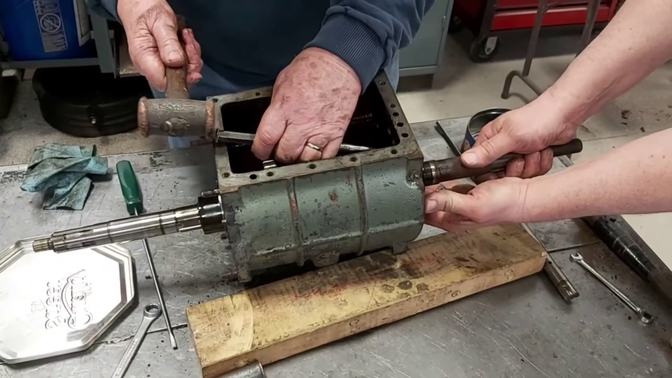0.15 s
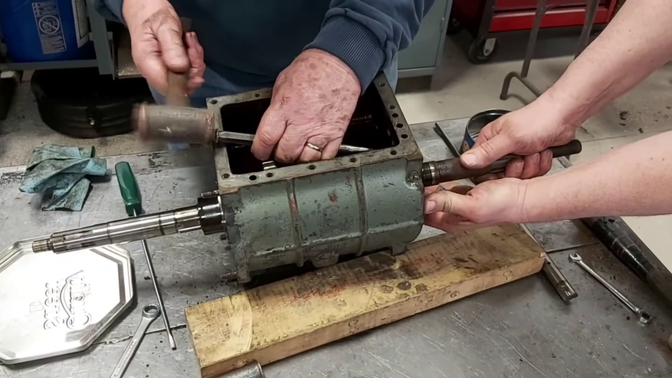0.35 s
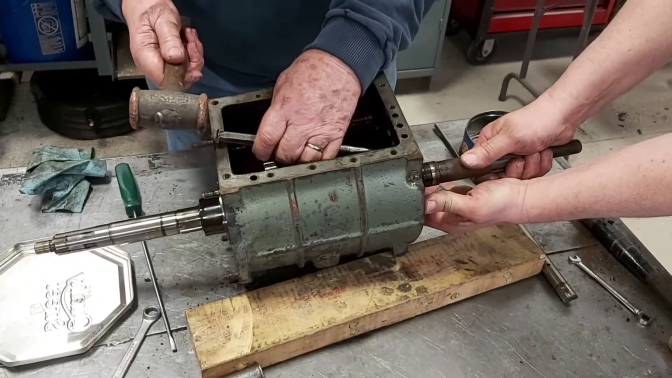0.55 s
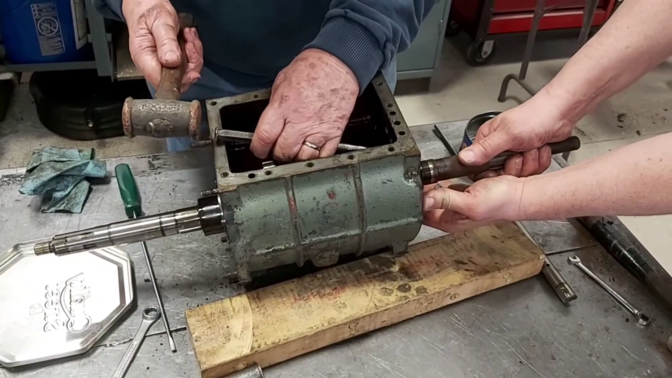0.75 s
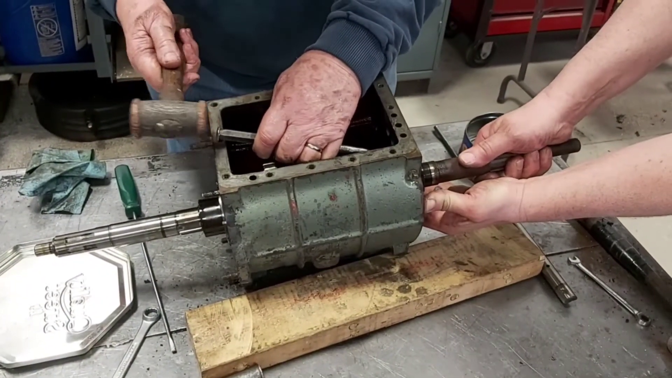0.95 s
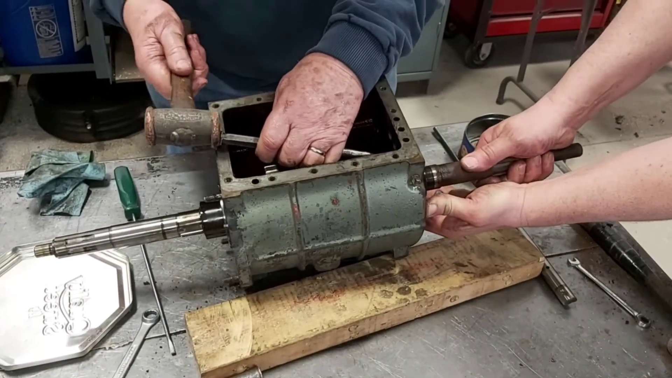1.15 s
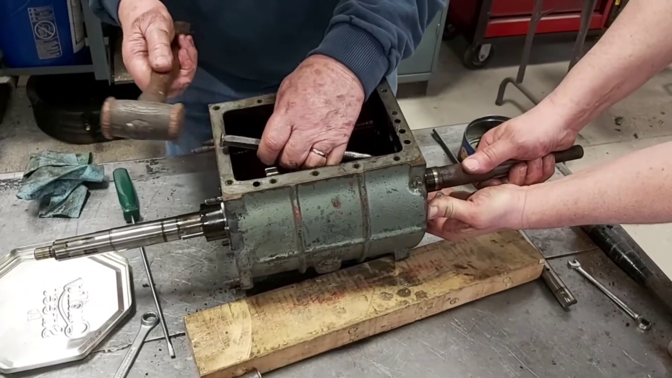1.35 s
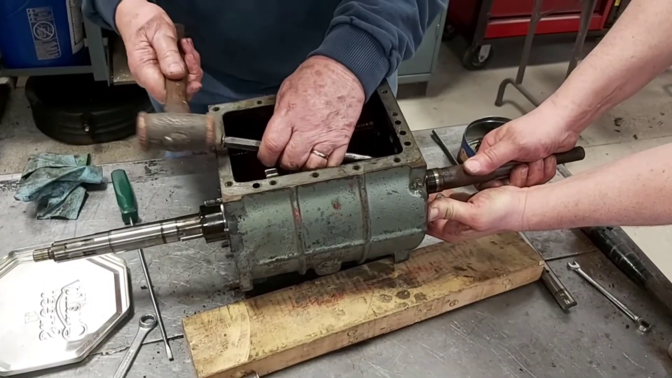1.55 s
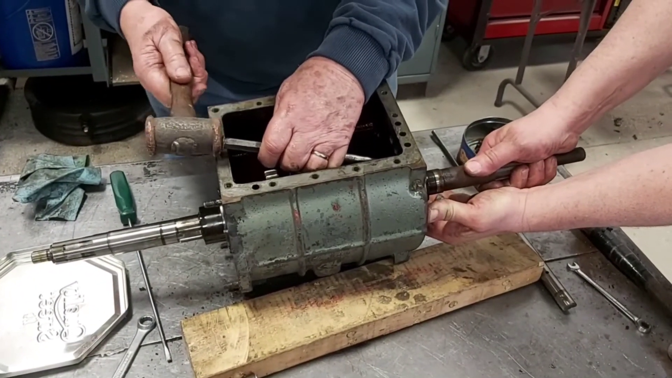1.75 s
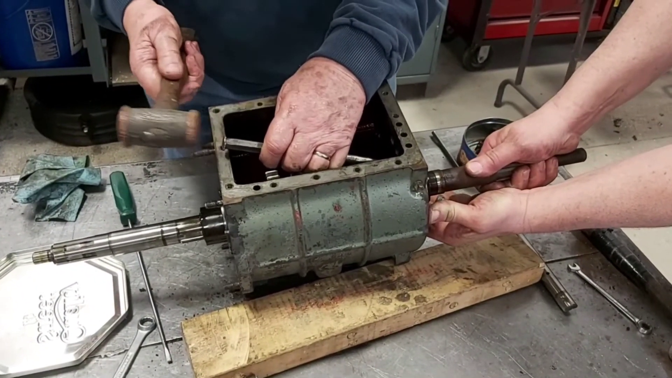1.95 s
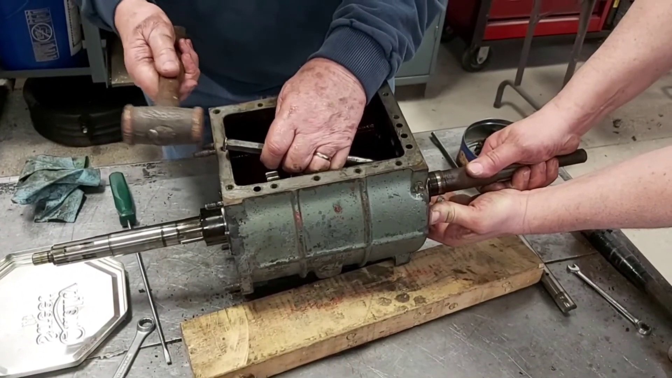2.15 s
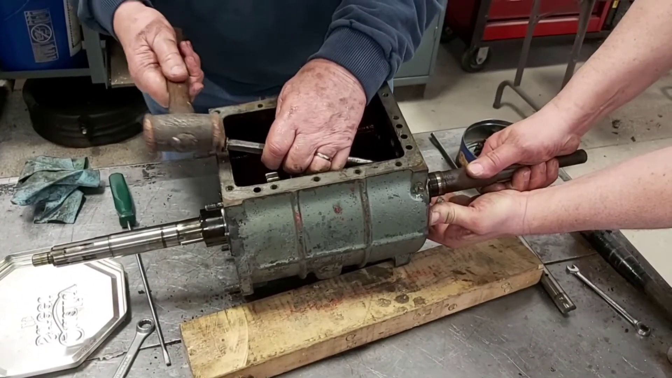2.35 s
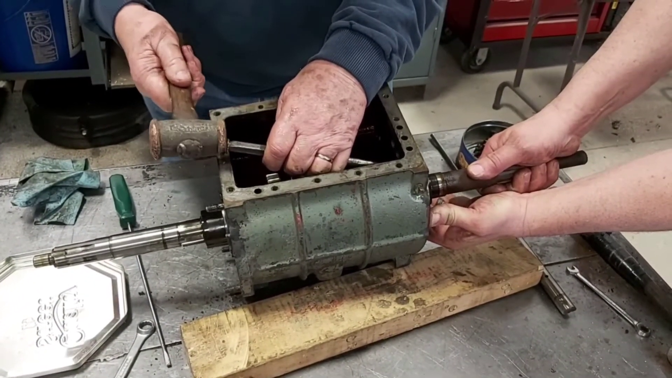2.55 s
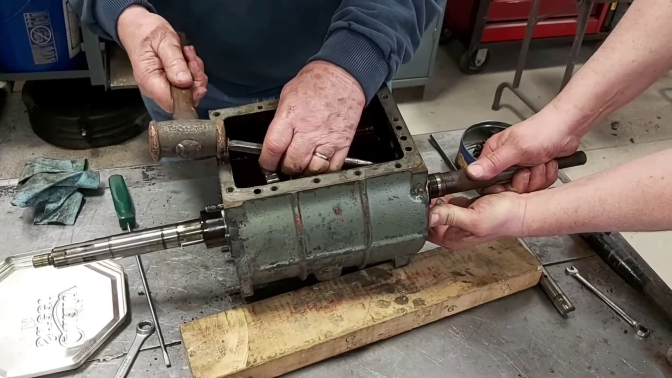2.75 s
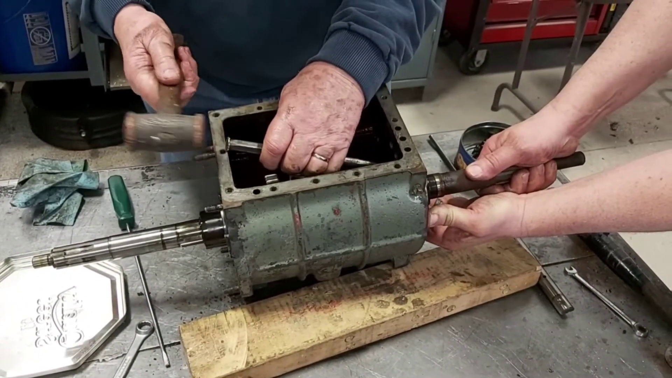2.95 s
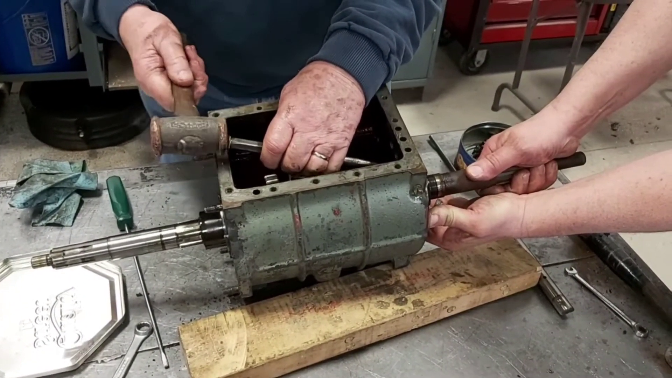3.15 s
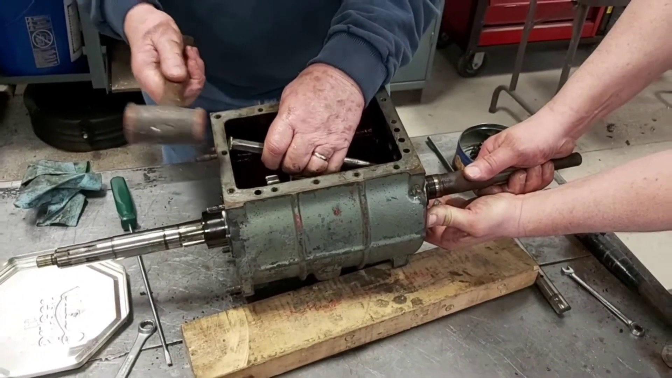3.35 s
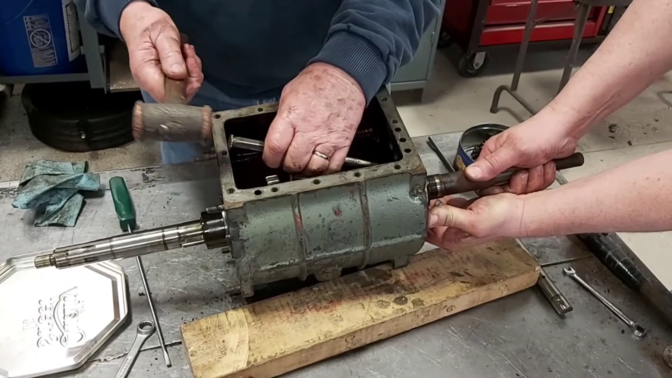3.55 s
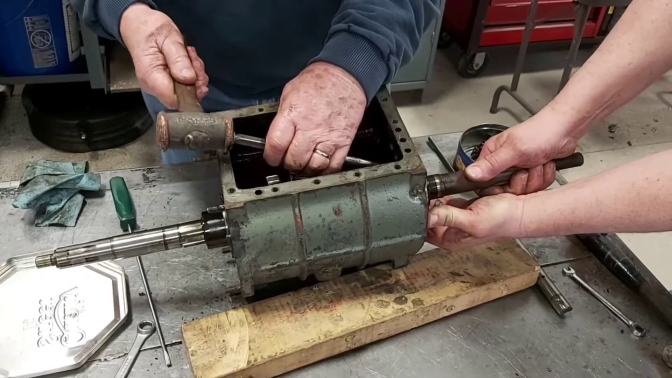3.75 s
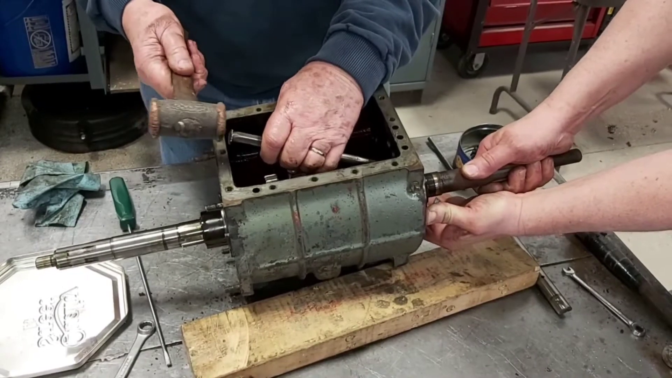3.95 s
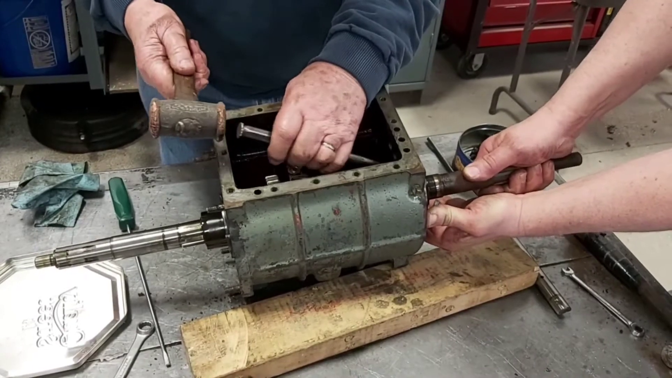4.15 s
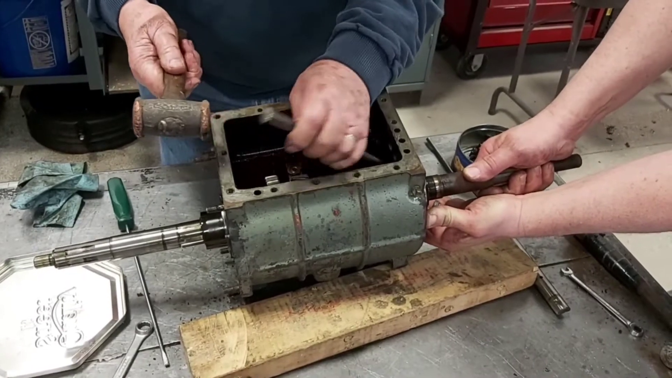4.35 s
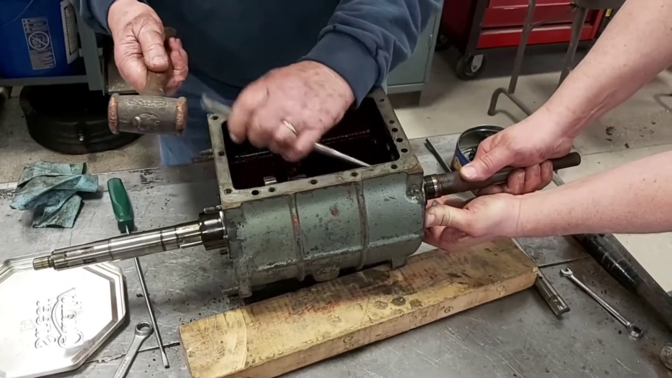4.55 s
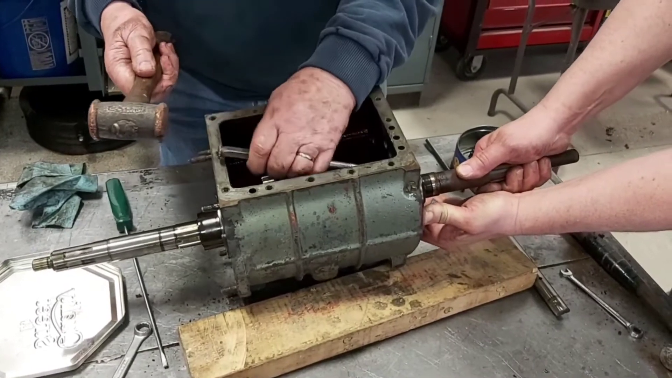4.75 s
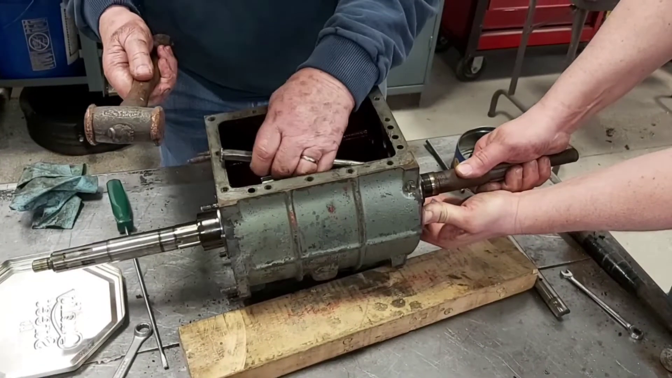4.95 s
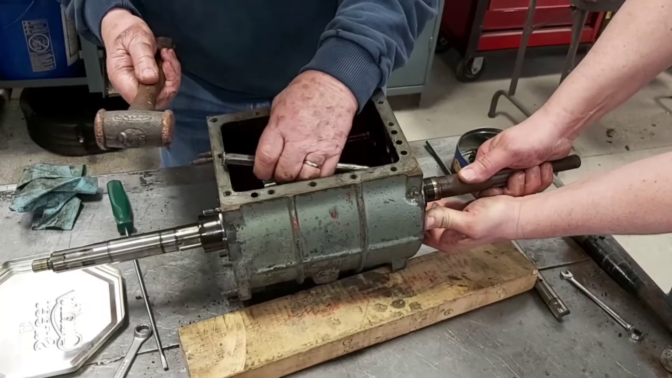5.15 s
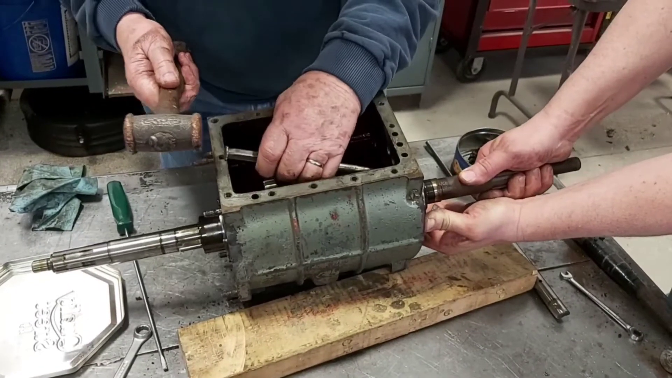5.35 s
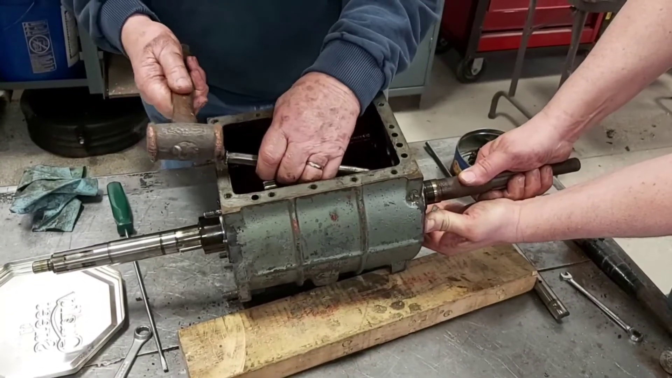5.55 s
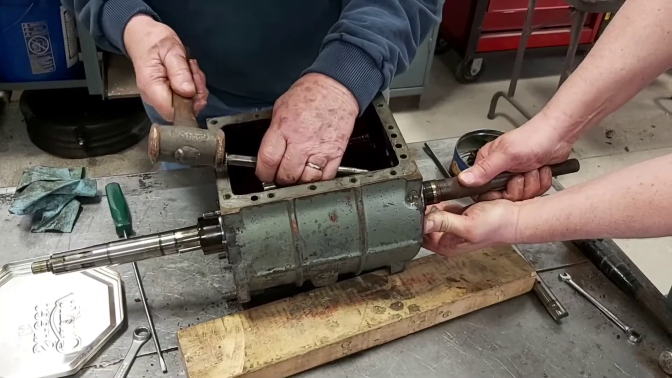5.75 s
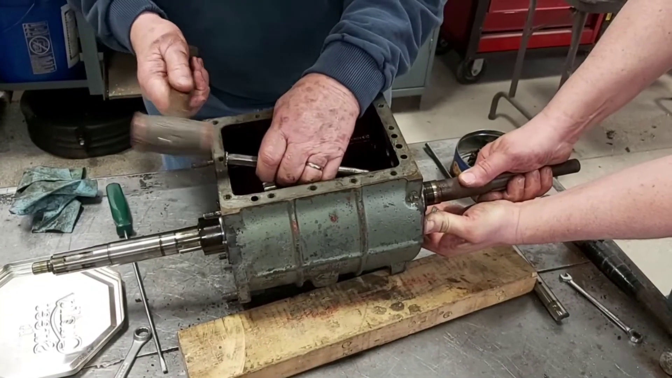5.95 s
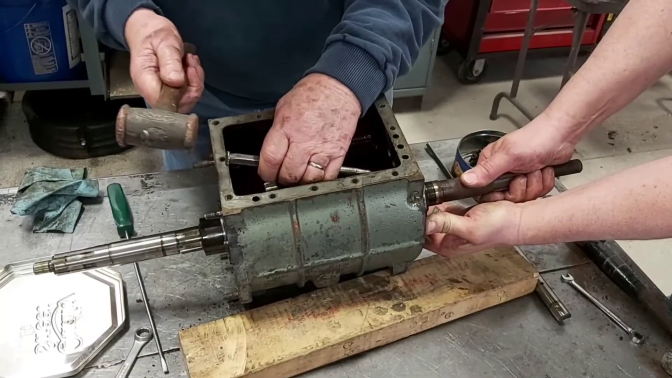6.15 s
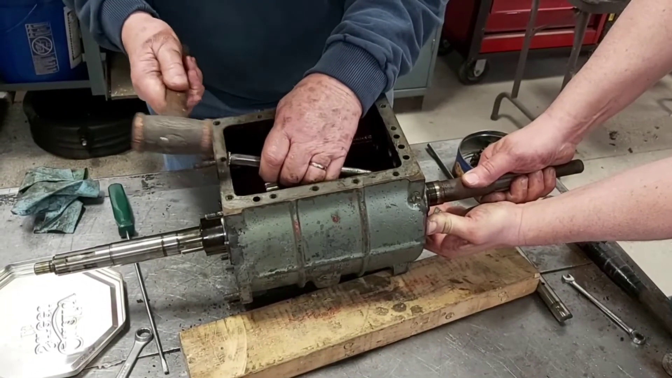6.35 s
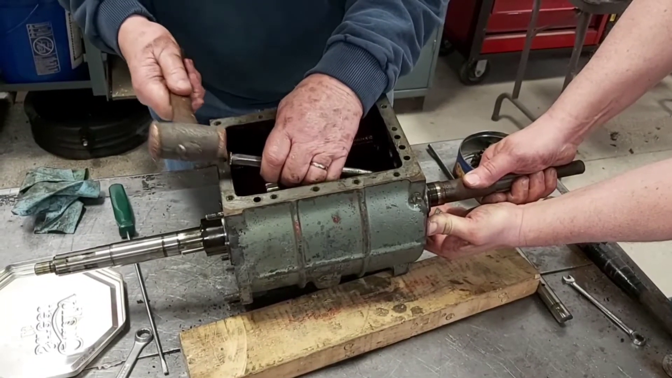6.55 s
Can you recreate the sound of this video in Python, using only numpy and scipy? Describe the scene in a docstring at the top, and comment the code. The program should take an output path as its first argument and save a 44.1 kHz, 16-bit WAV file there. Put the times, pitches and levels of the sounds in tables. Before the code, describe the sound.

Close stereo pickup in a hard-walled workshop. A mallet hits a steel drift against a heavy iron casing: bright, chattering cracks with short metallic ring, leaning left, each followed by roughly a second of room reverberation. Eleven blows come in uneven runs, the late ones ringing loudest. A pause brings soft rustle, dull wooden bumps and a clear steel clink, then five steady blows finish.

```python
"""A mallet drives a steel drift into a cast-iron gear casing that lies on a plank in a hard-walled workshop.
Low noise starts louder with an earlier blow's tail; each blow chatters (shaped noise), rings the casing (decaying
modes) and pushes air, mostly to the left. The room answers with a diffuse field that decays band by band; light
touches bounce once. The shaft sings (resonant noise) most near 3.7 s; in a pause after it there is a rustle, the
casing bumps on the plank and the drift clinks back in, grating and ringing in its own modes; then blows resume."""
import sys
import numpy as np
from scipy import signal
from scipy.fft import rfft, irfft
from scipy.io import wavfile

SR = 44100
rng = np.random.default_rng(int(sys.argv[2]) if len(sys.argv) > 2 else 0)


def master_out(mix):
    """Clip the mix to full scale and print it as 16-bit PCM to the path in sys.argv[1]."""
    frames = np.transpose(np.atleast_2d(mix))
    ceiling = np.clip(frames, -1, 1)
    pcm = np.round(ceiling * 32767).astype(np.int16)
    wavfile.write(sys.argv[1], SR, pcm)


N = 290619
SHORT, LONG = SR // 2, SR * 5 // 4  # buffer lengths in samples: 0.5 s and 1.25 s

# Level tables hold relative decibels; a density is the relative power per hertz of a noise spectrum.
# workshop's low noise: pitch_hz, density_db
WORKSHOP_NOISE = [(18, -30), (30, -30.5), (134, -14), (364, -8.5), (415, -19.5), (760, -19.5), (937, -20),
                  (1630, -23), (1760, -23), (5450, -36.5), (11100, -39.5), (16000, -59)]
# louder stretches of the low noise, the fading tail of an earlier blow at the start, then a rustle
# in the pause: start_s, end_s, level_db
LOUDER_STRETCHES = [(0, 0.16, -47), (3.95, 5.495, -51)]
STRETCH_FADE_DB_PER_S, QUIET_DB = 24, -67

# mallet blows: start_s, crack_db, brightness_db, stressed_region_hz, main_ring_db, body_mode_db,
# slap_db, air_puff_db, room_share_db
BLOWS = [(0.1485, -14.5, -5.5, 3720, -18, -20, -37, -40, -22.5),
         (0.4355, -23, -13.5, 2040, -13, -38, -36, -32, -10.5),
         (1.2064, -20.5, -0.5, 5090, -29.5, -49, -28, -19.5, -16),
         (1.5337, -19.5, -3, 4730, -29, -43, -27.5, -20.5, -14),
         (1.8181, -17, 2, 4300, -24, -33, -27, -25.5, -16),
         (2.0724, -19, 2.5, 5440, -28, -41, -21.5, -36, -17),
         (2.3423, -17.5, 0.5, 5000, -29.5, -33, -37.5, -33.5, -18),
         (2.5914, -18, -1.5, 2420, -28, -33, -24.5, -26, -14.5),
         (3.1873, -17, -1.5, 3040, -32, -38, -83, -38.5, -18),
         (3.47, -10.5, -1.5, 2450, -17.5, -33.5, -43, -33, -21.5),
         (3.7179, -17.5, -2.5, 3050, -22, -42, -41, -41, -14),
         (5.5972, -15.5, -5.5, 3770, -19, -68, -42, -52, -15),
         (5.8474, -17.5, -8.5, 1990, -27, -42, -51, -43, -11.5),
         (6.088, -20, -4.5, 2050, -31.5, -47, -25.5, -21, -13),
         (6.3305, -16.5, 0.5, 4000, -29.5, -26, -21.5, -46.5, -16),
         (6.5782, -18.5, -3, 3040, -29.5, -26, -23.5, -43, -16)]
# modes of the casing: pitch_hz, level_db, t60_s
CASING = [(382, 0, .11), (853, -5, .09), (945, 0, .035), (998, -2, .045), (1372, 0, .07), (1600, -9, .03),
          (1750, -10, .12), (2150, -9, .04), (2495, -7, .09), (2620, -5, .05), (3000, -1, .055),
          (3740, -3, .045), (4225, 0, .05), (4750, -5, .05), (5210, -3, .06), (5410, -3, .07),
          (6150, -6, .045), (7150, -5, .04), (7600, -4, .04), (8745, -6, .07), (11850, -11, .06)]
BODY_TOP_HZ, RING_TOP_HZ, OVERTONE_TOP_HZ = 600, 1150, 1900
# dense upper modes of the casing: pitch_hz, density_db
CRACK = [(100, -27), (300, -8.5), (700, -7), (1200, -2.5), (2000, -2.5), (3300, -5.5), (4600, -1.5),
         (6200, -3.5), (7700, 0.5), (9300, -7.5), (12000, -6.5), (15500, -16.5)]
# room's answer to a crack: pitch_hz, density_db
ROOM = [(50, -12.5), (100, 2), (200, -1), (380, 1.5), (600, 1.5), (1100, 2), (1800, 5), (3200, 1.5),
        (4800, 1), (6400, -4.5), (7800, -3.5), (9500, -10.5), (15000, -18.5)]
# room's answer to the ring: pitch_hz, density_db
ROOM_RING = [(400, -61), (720, -13), (870, -3.5), (945, 1), (1005, 5), (1100, -14.5), (1380, -6),
             (1900, -12), (4000, -61)]
# casing modes that stand out in the room's wash: pitch_hz, level_db
LINGERING = [(380, 6), (855, 1.5), (1755, -0.5)]
# reverberation: pitch_hz, t60_s
ROOM_T60 = [(80, 0.39), (350, 0.53), (950, 0.77), (1400, 0.92), (3000, 0.82), (5500, 0.71), (9000, 0.5),
            (15000, 0.32)]
# left minus right for direct sound: pitch_hz, difference_db
NEAR_LEAN = [(100, -14.5), (400, 2.5), (1000, -1), (2000, 1.5), (3300, 6), (4800, 11), (8000, 14.5),
             (15000, 14)]
# left minus right for room sound: pitch_hz, difference_db
ROOM_LEAN = [(100, 3.9), (300, 1), (1000, 1.1), (2500, 1.3), (4800, 7), (8000, 7.5), (15000, 5)]
# likeness of left and right noise: pitch_hz, correlation (no unit)
LIKENESS = [(100, 0.98), (500, 0.66), (1000, 0.14), (2000, 0), (4000, 0.085), (15000, 0.1)]
# modes of the loosened shaft: pitch_hz, level_db
SINGING = [(2500, 2), (2640, 3), (2960, -5), (3620, -5), (4220, -3), (5420, 5), (8790, -1)]
# light touches: start_s, crack_db, brightness_db, main_ring_db, body_mode_db, overtones_db
TOUCHES = [(0.9167, -24, -3.5, -36.5, -27, -30.5), (2.9591, -30.5, 3.5, -41, -52, -43),
           (4.08, -26, -14.5, -25, -40.5, -31.5), (5.0114, -25, -14, -29, -48, -29.5),
           (5.3449, -26, -9, -24, -46, -20.5)]
# casing rocking on the plank: start_s, level_db
BUMPS = [(4.239, -29.5), (4.248, -26), (5.335, -33)]
# spectrum of the plank: pitch_hz, density_db
PLANK = [(50, -33), (90, -3.5), (170, -0.5), (300, -7.5), (700, -8.5), (1500, -23.5), (4000, -32),
         (14000, -44)]
# drift touching the casing: start_s, level_db, contact_s
CLINKS = [(4.473, -42, 0.0044), (4.494, -40, 0.0028), (4.505, -39.5, 0.0013), (4.8316, -17, 0.0046),
          (4.8454, -18.5, 0.0017), (4.962, -39, 0.0021), (5.015, -43, 0.0045)]
# modes of the drift when free of the hand: pitch_hz, level_db, t60_s
DRIFT = [(960, -6, .06), (1385, -8, .08), (3146, -2, .2), (3268, -3, .18), (5998, 4, .2), (6070, -7, .05),
         (6500, -11, .06), (9392, 4, .065), (9455, 0, .06), (9570, 0, .035), (13540, -9, .07),
         (13660, -8, .06)]

# all touches share their pitch, stressed region, clarity, room share and bounce
TOUCH_PITCH_HZ, TOUCH_STRESS_HZ, TOUCH_CLARITY_DB = 1020, 3430, 1
TOUCH_ROOM_DB, BOUNCE_S, BOUNCE_LOSS_DB = -22.5, .0065, 6.5
USUAL_RING_DB, USUAL_SLAP_DB = -26, -36
# a stronger ring favours the higher of the main modes
RING_PITCH_HZ, PITCH_HZ_PER_DB = 949, 10
# overtones grow with the ring; a firmly seated blow, which slaps, damps them (factors in dB per dB)
OVERTONE_DB, OVERTONE_FOLLOWS, SEATING_DAMPS = -27, 0.74, 0.18
# the contact stresses one region, more so if sharper or with a stronger ring (factors in dB per dB)
STRESS_DB, STRESS_PER_BRIGHTNESS, STRESS_PER_RING = 7, 0.44, 0.31
# a stronger ring lets the clear upper modes stand out from the chatter (dB per dB)
CLARITY_PER_RING = 0.085
# the shaft works loose and sings most near this moment; its level is relative to the crack
LOOSE_S, SING_DB, SING_FALL_DB_PER_S = 3.68, -9.5, 51
LEFT_LEAD_S, CUTOFF_HZ = 3 / SR, 16000
HZ = np.arange(20, 16000, 10)  # pitches of a finely drawn spectrum
KNOTS = np.arange(0, 16100, 80)  # pitches in Hz at which the upper modes ripple the spectrum


def from_db(db):
    """Decibel law: an amplitude ratio from a level."""
    return 10 ** (np.asarray(db) / 20)


def at_hz(points, hz):
    """Log-frequency interpolation: read a table at given pitches."""
    f, value = np.transpose(points)
    return np.interp(np.log(np.maximum(hz, 1)), np.log(f), value)


def lean(db):
    """Level panning: left and right gains of mean power 1 for a level difference."""
    gains = from_db(np.array([[.5], [-.5]]) * db)
    return gains / np.sqrt(np.mean(gains ** 2, axis=0))


def fade(t60, size):
    """Exponential damping: a fall of 60 dB in t60 seconds."""
    return from_db(-60 * np.arange(size) / SR / t60)


def contact(length_s, size):
    """Finite contact time: vibration builds up smoothly to full strength."""
    return np.sin(np.pi / 2 * np.minimum(np.arange(size) / SR / length_s, 1)) ** 2


def level(x, db):
    """Root-mean-square scaling: set the level of a sound's first 27 ms."""
    return x * from_db(db) / np.sqrt(np.mean(x[:, :int(.027 * SR)] ** 2) + 1e-20)


def add(track, s, x):
    """Superposition: mix a sound in at time s."""
    i = round(s * SR)
    track[:, i:i + x.shape[1]] += x[:, :N - i]


def noise(spectrum, leaning, size, band=(20, 16000)):
    """Partial coherence: coloured stereo noise with rms 1 inside the band."""
    hz = np.fft.rfftfreq(size, 1 / SR)
    mid, side = rfft(rng.standard_normal((2, size)))
    alike = np.clip(at_hz(LIKENESS, hz), -1, 1)
    gain = from_db(at_hz(spectrum, hz)) * (hz > 20)
    gain = gain / np.sqrt(2 * np.mean(gain ** 2 * (hz > band[0]) * (hz < band[1])))
    stereo = np.sqrt(1 + alike) * mid + np.sqrt(1 - alike) * side * [[1], [-1]]
    return irfft(gain * lean(at_hz(leaning, hz)) * stereo, size)


def brighter(spectrum, bright_db):
    """Contact sharpness: a sharper contact lifts the top of a spectrum."""
    lift = [(4000, 0.064), (8000, 0.94)]
    return [(hz, db + bright_db * at_hz(lift, hz)) for hz, db, *rest in spectrum]


def tinted(spectrum, extra_db):
    """Spectral product: finer detail laid over a short spectrum."""
    return np.column_stack([HZ, at_hz(spectrum, HZ) + extra_db])


def peaks(modes, width_hz):
    """Resonance curves: the summed power spectrum of a set of modes."""
    power = sum(from_db(db) ** 2 / (1 + ((HZ - hz) / width_hz) ** 2) ** 1.5 for hz, db, *rest in modes)
    return np.column_stack([HZ, 10 * np.log10(power)])


def ring(modes, contact_s, bright_db=0):
    """Modal superposition: decaying sines of varying strength, the upper ones out of step at the two sides."""
    t = np.arange(SHORT) / SR + [[LEFT_LEAD_S], [0]]
    out = 0
    for (hz, db), (_, _, t60) in zip(brighter(modes, bright_db), modes):
        phase = rng.uniform(0, 2 * np.pi) + rng.normal(0, 1, (2, 1)) * min(hz / 5000, 1)
        gain = from_db(db + rng.normal(0, 2.5)) * lean(at_hz(NEAR_LEAN, hz))
        out = out + gain * np.sin(2 * np.pi * hz * t + phase) * fade(t60, SHORT)
    return out * contact(contact_s, SHORT)


def swing(hz, t60):
    """Damped oscillator: a decaying sine that starts from zero."""
    return np.sin(2 * np.pi * hz * np.arange(SHORT) / SR) * fade(t60, SHORT)


def reverberate(x, build_s):
    """Diffuse field: sound builds up, then dies band by band; decay gain is 1 at a tenth of a second."""
    hz, spectrum = np.fft.rfftfreq(LONG, 1 / SR), rfft(x)
    out = 0
    for k, (_, t60) in enumerate(ROOM_T60):
        # overlapping triangular bands that add up to one
        share = at_hz([(f, j == k) for j, (f, _) in enumerate(ROOM_T60)], hz)
        out = out + irfft(spectrum * share, LONG) * fade(t60, LONG) * from_db(6 / t60)
    return out * contact(build_s, LONG)


def background():
    """Power addition: steady low noise is louder in an earlier blow's tail at the start and a later rustle."""
    t, gain = np.arange(N) / SR, from_db(QUIET_DB)
    for start_s, end_s, db in LOUDER_STRETCHES:
        away_s = abs(t - np.clip(t, start_s, end_s))
        gain = np.hypot(gain, from_db(db - STRETCH_FADE_DB_PER_S * away_s))
    return gain * noise(WORKSHOP_NOISE, ROOM_LEAN, 7 * SR)[:, :N]


def casing_modes(low, high):
    """Modal grouping: the casing's modes within a range of pitch."""
    return [mode for mode in CASING if low <= mode[0] < high]


def main_modes(pitch_hz, reach_hz=82.7):
    """Point excitation: the spot that is struck favours the main modes near one pitch."""
    return [(hz, db - 6 * abs(hz - pitch_hz) / reach_hz, t60)
            for hz, db, t60 in casing_modes(BODY_TOP_HZ, RING_TOP_HZ)]


def casing_ring(body_db, ring_db, over_db, pitch_hz):
    """Modal radiation: the casing's body mode, main ring and overtones, each at its own level."""
    body = level(ring(casing_modes(0, BODY_TOP_HZ), contact_s=0.0027), body_db)
    main = level(ring(main_modes(pitch_hz), contact_s=0.0025), ring_db)
    over = level(ring(casing_modes(RING_TOP_HZ, OVERTONE_TOP_HZ), contact_s=0.00073), over_db)
    return body + main + over


def upper_colour(dense_modes, bright_db, ring_db, stress_hz, stress_octaves=0.2):
    """Modal density: many upper modes ripple the spectrum, partly alike each time; contact stresses a region."""
    knots_db = 2.2 * dense_modes + 2.4 * rng.standard_normal(len(KNOTS))
    ripple_db = np.interp(HZ, KNOTS, knots_db) * np.minimum(HZ / 3000, 1)
    stress_db = STRESS_DB + STRESS_PER_BRIGHTNESS * bright_db + STRESS_PER_RING * (ring_db - USUAL_RING_DB)
    region = np.exp(-(np.log2(HZ / stress_hz) / stress_octaves) ** 2)
    return ripple_db + max(stress_db, 0) * region


def crack(crack_db, bright_db, colour_db=0, clarity_db=0,
          dense_db=-4.5, clear_db=-5.5, t60=0.029, rise_s=0.0013, hold_s=0.005):
    """Impact excitation: chattering contact drives a dense mass of short modes and a few clear ones."""
    t = np.arange(SHORT) / SR
    shape = contact(rise_s, SHORT) * from_db(-60 * np.maximum(t - hold_s, 0) / t60)
    spectrum = tinted(brighter(CRACK, bright_db), colour_db)
    dense = noise(spectrum, NEAR_LEAN, SHORT, band=(2000, 6000))
    clear = ring(casing_modes(OVERTONE_TOP_HZ, SR), contact_s=0.00064, bright_db=bright_db)
    chatter = dense * level(shape[None], crack_db + dense_db - clarity_db)
    return chatter + level(clear, crack_db + clear_db + clarity_db / 2)


def air_push(puff_db, slap_db):
    """Air displacement: the mallet's face squeezes out a slap, with a low throb of bench and plank."""
    puff = (swing(65, 0.13) + 0.93 * swing(97.7, 0.16)) * lean(27)
    slap = -(swing(316, 0.013) + 1.22 * swing(518, 0.015)) * lean(29)
    return level(puff, puff_db) + level(slap, slap_db)


def room_answer(crack_db, bright_db, colour_db, ring_db, body_db, pitch_hz, room_db,
                linger_width_hz=34.0, wash_db=-1.95, spread_db=-2, steady_db=-6):
    """Reverberation: the room returns one share of crack and ring; main modes hang on, a few others linger."""
    wash_spectrum = tinted(brighter(ROOM, 1.07 * bright_db), 0.74 * colour_db)
    wash = from_db(crack_db + wash_db) * noise(wash_spectrum, ROOM_LEAN, LONG, band=(2000, 6000))
    hang = from_db(ring_db + spread_db) * noise(ROOM_RING, ROOM_LEAN, LONG, band=(750, 1500))
    t = np.arange(LONG) / SR
    tones = sum(from_db(db) * np.sin(2 * np.pi * (hz * t + rng.random((2, 1))))
                for hz, db, _ in main_modes(pitch_hz))
    steady = from_db(ring_db + steady_db) * tones / tones.std()
    linger_gain = from_db(crack_db + room_db - 13.5) + from_db(body_db - 21.5)
    linger = linger_gain * noise(peaks(LINGERING, linger_width_hz), ROOM_LEAN, LONG)
    return reverberate(from_db(room_db) * (wash + hang + steady) + linger, build_s=0.013)


def singing_shaft(width_hz=28.0, t60=0.55):
    """Narrow-band resonance: the loosened shaft sings on after a blow."""
    return noise(peaks(SINGING, width_hz), ROOM_LEAN, LONG) * contact(.003, LONG) * fade(t60, LONG)


def mallet(dense_modes, left_db=-3.0):
    """Impact response: each blow joins casing ring, crack, push of air, room and singing shaft."""
    out = np.zeros((2, N))
    for s, crack_db, bright_db, stress_hz, ring_db, body_db, slap_db, puff_db, room_db in BLOWS:
        colour_db = upper_colour(dense_modes, bright_db, ring_db, stress_hz)
        stronger_db, firmer_db = ring_db - USUAL_RING_DB, slap_db - USUAL_SLAP_DB
        over_db = OVERTONE_DB + OVERTONE_FOLLOWS * stronger_db - SEATING_DAMPS * firmer_db
        pitch_hz = RING_PITCH_HZ + PITCH_HZ_PER_DB * stronger_db
        sing_db = crack_db + SING_DB - SING_FALL_DB_PER_S * abs(s - LOOSE_S)
        add(out, s, casing_ring(body_db, ring_db, over_db, pitch_hz))
        add(out, s, crack(crack_db, bright_db, colour_db, CLARITY_PER_RING * stronger_db) * lean(left_db))
        add(out, s + 0.00096, air_push(puff_db, slap_db))
        add(out, s, room_answer(crack_db, bright_db, colour_db, ring_db, body_db, pitch_hz, room_db))
        add(out, s, from_db(sing_db) * singing_shaft())
    return out


def touches(dense_modes):
    """Rebound: a light touch pushes no air, stirs the room little and bounces once more."""
    out = np.zeros((2, N))
    for s, crack_db, bright_db, ring_db, body_db, over_db in TOUCHES:
        colour_db = upper_colour(dense_modes, bright_db, ring_db, TOUCH_STRESS_HZ)
        for delay_s, gain in (0, 1), (BOUNCE_S, from_db(-BOUNCE_LOSS_DB)):
            casing = casing_ring(body_db, ring_db, over_db, TOUCH_PITCH_HZ)
            knock = casing + crack(crack_db, bright_db, colour_db, TOUCH_CLARITY_DB)
            add(out, s + delay_s, gain * knock)
        add(out, s, room_answer(crack_db, bright_db, colour_db, ring_db, body_db,
                                TOUCH_PITCH_HZ, TOUCH_ROOM_DB))
    return out


def plank_bumps(t60=0.079, throb_db=-6.0):
    """Heavy damping: dull wooden thuds die fast and set the bench throbbing."""
    out = np.zeros((2, N))
    for s, db in BUMPS:
        decay = fade(t60, LONG) + from_db(-18.0) * fade(0.63, LONG)  # a fast fall over a faint tail
        thud = noise(PLANK, ROOM_LEAN, LONG) * contact(0.0081, LONG) * decay
        throb = swing(96.3, 0.26) * contact(0.015, SHORT) * lean(4.4)
        add(out, s, level(thud, db))
        add(out, s, level(throb, db + throb_db))
    return out


def drift_clinks(width_hz=55.0, room_db=-21, grate_db=-7, bright_db=2.5, grip=0.76):
    """Added damping: the steel rod grates on the rim and rings, shortened by grip; long modes feed the room."""
    out = np.zeros((2, N))
    held = [(hz, db, grip * t60) for hz, db, t60 in DRIFT]
    fed = [(hz, db + 20 * np.log10(t60)) for hz, db, t60 in DRIFT]
    for s, db, contact_s in CLINKS:
        rod = level(ring(held, contact_s, bright_db), db)
        grate = crack(db + grate_db, bright_db=-0.5) * contact(contact_s, SHORT)
        add(out, s, rod + grate)
        lingering = noise(peaks(fed, width_hz), ROOM_LEAN, LONG)
        wash = from_db(-4.5) * noise(ROOM, ROOM_LEAN, LONG)
        add(out, s, from_db(db + room_db) * reverberate(lingering + wash, build_s=0.014))
    return out


def scene():
    """Superposition: blows and touches share one casing; background, plank and drift join them."""
    dense_modes = rng.standard_normal(len(KNOTS))
    return background() + mallet(dense_modes) + touches(dense_modes) + plank_bumps() + drift_clinks()


def record(dry):
    """Clipping and low-pass filtering: peaks beyond full scale overload, then the top is cut."""
    top_cut = signal.ellip(10, .1, 70, CUTOFF_HZ, fs=SR, output="sos")
    return signal.sosfilt(top_cut, np.clip(dry, -1, 1))


dry = scene()
out = record(dry)
master_out(out)
```